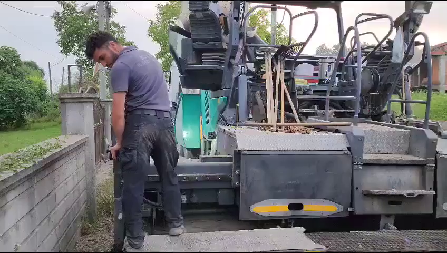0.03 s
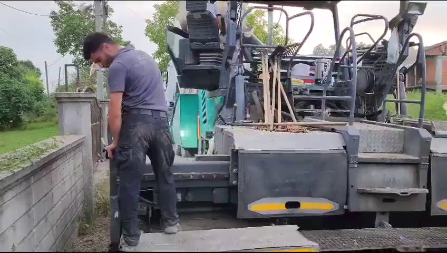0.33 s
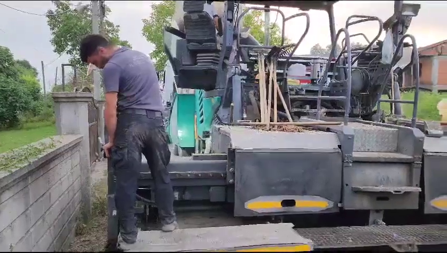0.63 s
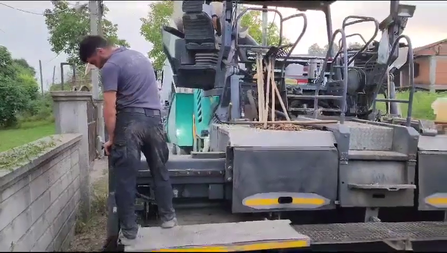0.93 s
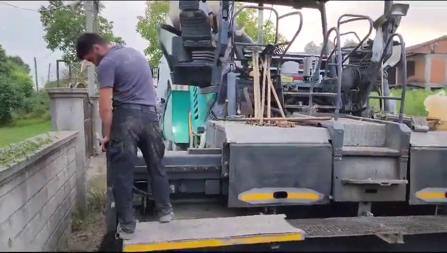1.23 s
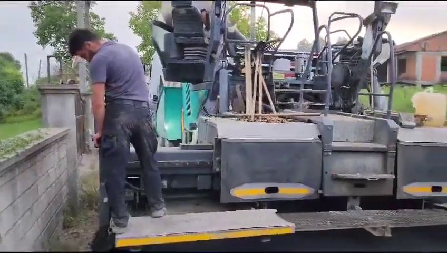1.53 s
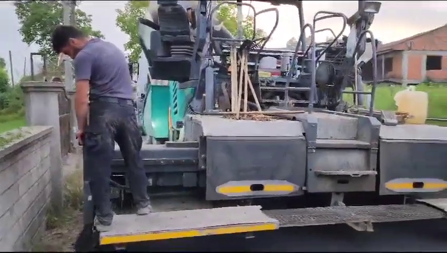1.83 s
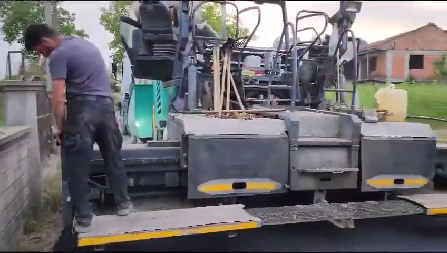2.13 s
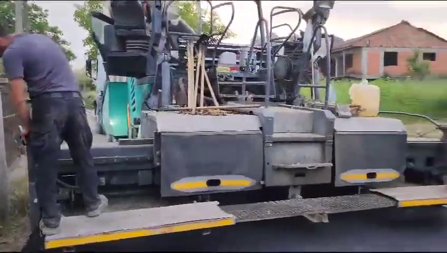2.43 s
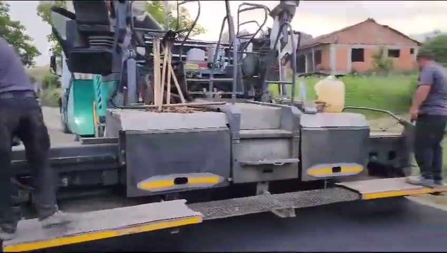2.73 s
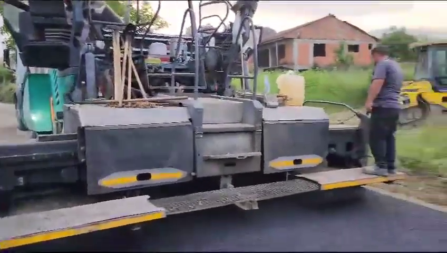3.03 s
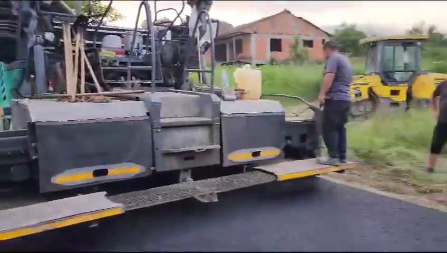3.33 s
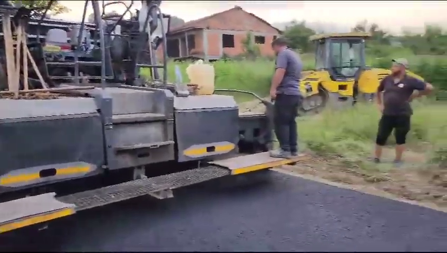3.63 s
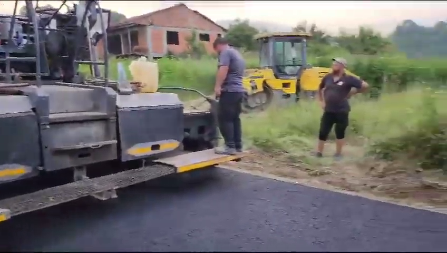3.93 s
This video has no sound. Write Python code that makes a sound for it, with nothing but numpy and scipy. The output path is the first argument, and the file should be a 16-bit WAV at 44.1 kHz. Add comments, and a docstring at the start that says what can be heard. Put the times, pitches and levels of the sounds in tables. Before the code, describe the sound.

An asphalt paver cuts in just after the start and runs loudly throughout, a few steps away outdoors. Its diesel engine, pumps and shaking screed make a heavy drone over a deep rumble, swelling around 1.3 to 2.1 seconds, near 3 and at 3.8. Above it is a gritty machinery roar with brief surges of hiss. From about 2.5 seconds the microphone swings and the roar turns slightly brighter.

```python
"""A heavy, wavering drone over a deep rumble cuts in: an asphalt paver working a few steps ahead.
The shaking screed, a six-cylinder diesel and its pumps make the drone; each stroke stirs the steel frame.
Above it the machinery roars, pulsed by the firings, and the auger churns gritty mix once a turn.
Late on the microphone swings along the screed, and the machinery's hiss opens up on the right."""
import sys
import numpy as np
from scipy import signal
from scipy.fft import rfft, irfft, next_fast_len
from scipy.io import wavfile
from scipy.ndimage import map_coordinates

SR = 44100
rng = np.random.default_rng(int(sys.argv[2]) if len(sys.argv) > 2 else 0)


def generate_wav(signal):
    """Clip the signal to [-1, 1] and save it as 16-bit WAV at the path in sys.argv[1]."""
    frames = np.transpose(np.atleast_2d(signal))
    scaled = np.clip(frames, -1, 1) * 32767
    pcm = np.round(scaled).astype(np.int16)
    wavfile.write(sys.argv[1], SR, pcm)


N = 176400

START_S, TOP_HZ = 0.1407, 15500  # the sound cuts in; its top edge
SCREED_HZ, SHAFT_HZ, SPEED_DRIFT = 20.17, 23.6, .003  # shaker strokes, crank turns, their relative wander
STROKE_DECAY_S, STROKE_SHARE = 0.0098, 0.073  # rumble after each stroke, and its share of the power
FIRING_DECAY_S, FIRING_SHARE = 0.0061, 0.061  # roar after each firing
GRIT_PER_S, GRIT_DECAY_S, GRIT_SHARE = 420, 0.0019, 0.11  # stones and chain links ticking on steel
AUGER_TURN_S, AUGER_PEAK_S, AUGER_SWELL_DB, SCRAPE_ABOVE_HZ = 0.551, 0.38, 0.8, 1770
ECHO_SPLIT_HZ = 1090  # the road reflects below this, the panels above

# screed drone at five times the stroke rate, before its trim: time_s, level_db
DRONE_RIDE = [(.2, -31), (.5, -24), (.85, -30), (1.3, -19), (1.7, -19.5), (2.1, -21), (2.55, -29),
              (2.95, -20.5), (3.25, -26.5), (3.45, -35), (3.85, -18.5), (4, -25)]
# the screed's other tones: stroke_multiple, level_db
SCREED_TONES = [(2, -47), (3, -33), (4, -36), (8, -37)]
# the diesel's tones, facing it: shaft_multiple, level_db
DIESEL_TONES = [(2, -40), (3, -33.5), (5, -29.5), (6, -24), (7, -27)]
# accent of each firing in one engine cycle: gain_db
FIRING_ACCENTS = [2, 0, 4.5, -4.5, -2, 4]
# hums of the hydraulic pumps: pitch_hz, level_db, flutter_db
PUMP_HUMS = [(209, -24.7, 1), (317, -29, 1.5)]
# rumble of frame and deck plates: frequency_hz, density_db
RUMBLE_COLOUR = [(15, -62), (29, -62), (37, -44), (50, -55), (62, -42.5), (90, -44.5), (130, -43),
                 (170, -42.5), (235, -40.5), (290, -45), (350, -49), (430, -62.5), (600, -77), (900, -120)]
# ride on the deepest part of that rumble: time_s, boost_db
BOOM_RIDE = [(.2, 0), (1.1, 1), (1.7, -1), (2.4, -2.5), (3.1, 2), (4, 0.5)]
# machinery roar before the swing: frequency_hz, left_density_db, right_density_db
COLOUR_AHEAD = [(362, -46.5, -45), (435, -45.5, -46.5), (512, -52, -45), (645, -47.5, -54.5),
                (760, -55.5, -53), (1000, -59, -56.5), (1230, -59, -60), (1490, -55.5, -55),
                (1800, -59.5, -61.5), (2130, -67, -59.5), (2550, -64, -63), (3130, -67.7, -59.5),
                (4240, -70, -61), (4630, -73, -65), (5520, -70.5, -61), (6100, -75, -74), (6900, -72, -85),
                (7400, -73.5, -69), (7650, -78, -80.5), (10400, -80, -80), (11900, -79.2, -73),
                (14500, -85, -85.8), (15600, -92.1, -92.7)]
# machinery roar after the swing: frequency_hz, left_density_db, right_density_db
COLOUR_TURNED = [(348, -43, -48.5), (430, -51.5, -46), (523, -45.5, -50.5), (630, -62, -47.5),
                 (786, -54, -63.5), (990, -57.5, -56), (1200, -57.5, -56.5), (1450, -62.5, -59),
                 (1770, -62.5, -59.5), (2170, -63.5, -61), (2600, -67.5, -62), (3270, -67.5, -60),
                 (4300, -70, -59.5), (5100, -70, -66.5), (5400, -75, -62.5), (6560, -69, -60.5),
                 (7050, -75, -70), (7300, -67, -62), (7610, -74, -73.5), (10100, -79.0, -79),
                 (12000, -78.3, -77), (14500, -82, -85.0), (15600, -88.1, -90.4)]
# ride on the machinery's treble: time_s, boost_db
TREBLE_RIDE = [(.2, 2), (.42, 0), (.55, -0.6), (1.15, -0.6), (1.42, -1.5), (1.7, -0.5), (2.3, -1.3),
               (3.4, 0), (3.7, -0.1), (4, 1.5)]
# hiss of mix sliding over steel: peak_s, half_length_s, boost_db
HISS_SURGES = [(0.302, .14, 2.5), (1.396, 0.16, 4.5), (1.952, 0.096, 3.5), (2.56, 0.1, 0), (3.7, 0.068, 2)]
# resonances that open or close in the swing: start_s, ramp_s, centre_hz, width_hz, boost_db
SWING_RESONANCES = [(2.85, .2, 2240, 650, 2.5), (3.3, .4, 850, 256, -2), (3.3, 0.64, 524, 190, 2)]
# ring of the screed's steel: centre_hz, width_hz, boost_db
STEEL_RING = [(738, 120, 2.5), (2130, 600, 0.8)]
# hollow left by the bounce off the road: time_s, left_notch_hz, right_notch_hz
ROAD_HOLLOW = [(.2, 520, 566), (2.1, 513, 580), (2.8, 570, 660), (3.5, 630, 800), (4, 745, 930)]
# the microphone's swing: time_s, share_of_swing
MIC_SWING = [(.2, 0.12), (.55, 0.11), (1.15, 0.027), (1.42, 0.32), (1.7, 0.26), (2.25, 0.29), (2.55, 0.52),
             (2.8, 0.48), (3.1, 0.66), (3.7, 1)]
# stereo width: frequency_hz, side_over_mid_db
STEREO_WIDTH = [(60, -50), (125, -34), (250, -20), (430, -11), (580, -12), (850, -8.5), (1150, -3),
                (2100, -2.5), (4000, 0.5), (15000, -2.1)]
# phase by which the left channel leads: frequency_hz, lead_rad
LEFT_LEAD = [(330, 0.17), (450, 0.35), (600, 1.6), (820, 0.25), (1100, 0.4), (1400, 3.24), (1900, 5.3),
             (2600, 6.4), (15000, 6.3)]


def screed(stroke, drone_trim_db=-1):
    """The shaker hums at multiples of its stroke rate; the fifth swells and sinks as the main drone."""
    hum = sum(tone(multiple * stroke, db, flutter_db=1) for multiple, db in SCREED_TONES)
    return hum + tone(5 * stroke, curve(DRONE_RIDE) + drone_trim_db, flutter_db=1.7)


def diesel(shaft, turned_away_db=-2.5):
    """The engine drones at multiples of its crank rate, softer as the microphone swings away."""
    away_db = turned_away_db * curve(MIC_SWING)
    return sum(tone(multiple * shaft, db + away_db, flutter_db=1) for multiple, db in DIESEL_TONES)


def pumps_and_drive():
    """The pumps hum over the low note of the drive, their pitch wandering under load."""
    pumps = sum(tone(turns(hz, drift=.004, rate=2), db, flutter) for hz, db, flutter in PUMP_HUMS)
    drive = tone(turns(hz=38.3, drift=0.0052, rate=9.3), db=-34, flutter_db=3.5)
    return pumps + drive


def frame_rumble(stroke):
    """Every stroke stirs the frame and deck plates, and their deep boom slowly heaves."""
    hits = beats(stroke)
    shake = bursts(hits, amp(1.3 * rng.standard_normal(len(hits))), STROKE_DECAY_S)
    power = 1 - STROKE_SHARE + STROKE_SHARE * shake
    rumble = filtered(stereo_noise() * np.sqrt(power), lambda hz: amp(along(RUMBLE_COLOUR, hz)))
    return boosted(rumble, centre_hz=62, width_hz=65, db=curve(BOOM_RIDE))


def machinery(shaft):
    """A roar pulsed by the firings and peppered with grit, changing colour with the swing."""
    fired = beats(shaft * len(FIRING_ACCENTS) / 2)  # each cylinder fires every second turn
    firing = bursts(fired, np.resize(amp(FIRING_ACCENTS) ** 2, len(fired)), FIRING_DECAY_S)
    power = 1 - FIRING_SHARE - GRIT_SHARE + FIRING_SHARE * firing + GRIT_SHARE * grit()
    roar = auger(stereo_noise() * np.sqrt(power))
    swing = curve(MIC_SWING)
    return (1 - swing) * facing(roar, COLOUR_AHEAD) + swing * facing(roar, COLOUR_TURNED)


def grit():
    """Power envelope of stones and chain links ticking at random, most of them faint."""
    when, strength = rng.random((int(GRIT_PER_S * N / SR), 2)).T
    return bursts((when * N).astype(int), -np.log(1 - strength), GRIT_DECAY_S)


def auger(roar):
    """The scraping treble swells with each turn of the auger and flickers in between."""
    scrape = filtered(roar, lambda hz: hz ** 2 / (hz ** 2 + SCRAPE_ABOVE_HZ ** 2))
    churn = np.cos(2 * np.pi * (np.arange(N) / SR - AUGER_PEAK_S) / AUGER_TURN_S)
    swell_db = AUGER_SWELL_DB * churn + curve(TREBLE_RIDE) + 0.76 * wobble(11)
    return roar + (amp(swell_db) - 1) * scrape


def sliding_mix(roar):
    """High hiss surges as the mix slides over steel."""
    t = np.arange(N) / SR
    surge_db = sum(db * np.exp(-((t - peak_s) / half_s) ** 2) for peak_s, half_s, db in HISS_SURGES)
    return boosted(roar, centre_hz=5850, width_hz=1600, db=surge_db)


def swing_resonances(roar):
    """Resonances open up or close as the microphone turns."""
    t = np.arange(N) / SR
    for start_s, ramp_s, centre_hz, width_hz, db in SWING_RESONANCES:
        roar = boosted(roar, centre_hz, width_hz, db * np.clip((t - start_s) / ramp_s, 0, 1))
    return roar


def steel_panels(roar, count=5, gain=0.18, spread_s=.004):
    """The steel rings, and weak panel echoes comb each side's treble as the microphone sways."""
    ring_db = lambda hz: sum(db / (1 + (2 * (hz - f) / width) ** 2) for f, width, db in STEEL_RING)
    roar = filtered(roar, lambda hz: amp(ring_db(hz)))
    bright = filtered(roar, lambda hz: 1 - rolloff(hz, ECHO_SPLIT_HZ, 4))
    n = np.arange(N)
    echoes = np.zeros((2, N))
    for side in range(2):
        for k in range(count):
            delay = SR * spread_s * (k + 1 + rng.random()) / (count + 1)
            sway = 1 + .09 * wobble(1.2)
            echoes[side] += np.interp(n - delay * sway, n, bright[side])
    direct_gain = 1 / np.sqrt(1 + count * gain ** 2)  # makes room for the echoes
    return roar + (direct_gain - 1) * bright + gain * echoes


def road_bounce(roar, gain=0.47):
    """A dull echo off the road, half a cycle late at the hollow, which climbs with the swing."""
    dull = filtered(roar, lambda hz: rolloff(hz, ECHO_SPLIT_HZ, 4))
    n, hollow = np.arange(N), np.asarray(ROAD_HOLLOW)
    delays = [SR / (2 * curve(hollow[:, [0, column]])) for column in (1, 2)]
    echo = [np.interp(n - delay, n, side) for delay, side in zip(delays, dull)]
    return roar + gain * np.array(echo)


def facing(roar, colour, low_cut_hz=325):
    """The roar's left and right colour from one direction, leaving the lows to the rumble."""
    colour = np.asarray(colour)
    gains = lambda hz: amp([along(colour[:, [0, column]], hz) for column in (1, 2)])
    return filtered(roar, lambda hz: (1 - rolloff(hz, low_cut_hz, 6)) * gains(hz))


def stereo_noise():
    """Noise at 0 dB per Hz, centred in the bass and wide in the treble, with a phase lead on the left."""
    angle = lambda hz: np.arctan(amp(along(STEREO_WIDTH, hz)))
    white = rng.standard_normal((2, N))
    mid, side = filtered(white, lambda hz: np.array([np.cos(angle(hz)), np.sin(angle(hz))]))
    pair = np.sqrt(SR / 2) * np.array([mid + side, mid - side])
    lead = lambda hz: along(LEFT_LEAD, hz) * np.minimum(hz / LEFT_LEAD[0][0], 1) ** 2
    return filtered(pair, lambda hz: np.exp(.5j * np.outer([1, -1], lead(hz))))


def turns(hz, drift, rate):
    """Turns made by something spinning at a slightly unsteady speed."""
    return np.cumsum(hz * (1 + drift * wobble(rate))) / SR + rng.random()


def beats(phase):
    """Samples at which a turn is completed."""
    return np.flatnonzero(np.diff(np.floor(phase)))


def tone(phase, db, flutter_db):
    """A sine that flutters around the given rms level."""
    return np.sqrt(2) * amp(db + flutter_db * wobble(6.98)) * np.sin(2 * np.pi * (phase + rng.random()))


def bursts(where, sizes, decay_s):
    """Power envelope of mean 1: a jump at each given sample, then a decay."""
    keep = np.exp(-1 / (decay_s * SR))
    power = signal.lfilter([1], [1, -keep], np.bincount(where, sizes, N))
    return power / power.mean()


def boosted(x, centre_hz, width_hz, db):
    """A bell EQ whose gain moves in time."""
    band = filtered(x, lambda hz: np.exp(-(2 * (hz - centre_hz) / width_hz) ** 2))
    return x + (amp(db) - 1) * band


def filtered(x, response):
    """x times a complex response of frequency."""
    size = next_fast_len(N + SR // 2)
    return irfft(rfft(x, size) * response(np.fft.rfftfreq(size, 1 / SR)), size)[..., :N]


def rolloff(hz, corner_hz, order):
    """Low-pass gain, one half at the corner."""
    return 1 / (1 + (hz / corner_hz) ** order)


def wobble(rate):
    """A smooth random curve, rate knots a second."""
    return map_coordinates(rng.standard_normal(int(N * rate / SR) + 4), [np.arange(N) * rate / SR])


def curve(rows):
    """Rows of time_s, value as one value per sample."""
    return np.interp(np.arange(N) / SR, *np.transpose(rows))


def along(rows, hz):
    """Rows of frequency_hz, value read on a log axis."""
    frequencies, values = np.transpose(rows)
    return np.interp(np.log(hz + 1), np.log(frequencies + 1), values)


def amp(db):
    """Decibels as a gain."""
    return 10 ** (np.asarray(db) / 20)


def scene():
    """All parts of the paver, running together."""
    shaft = turns(SHAFT_HZ, SPEED_DRIFT, rate=2.96)
    stroke = turns(SCREED_HZ, SPEED_DRIFT, rate=1.8)
    low_end = screed(stroke) + frame_rumble(stroke) + diesel(shaft) + pumps_and_drive()
    roar = swing_resonances(sliding_mix(machinery(shaft)))
    return low_end + road_bounce(steel_panels(roar))


def record(dry):
    """The sound cuts in hard, with a steep edge on the top end."""
    gate = np.clip((np.arange(N) / SR - START_S) / .001, 0, 1)
    return filtered(dry * gate, lambda hz: np.clip((TOP_HZ - hz) / 200 + .5, 0, 1))


dry = scene()
out = record(dry)
generate_wav(out)
```